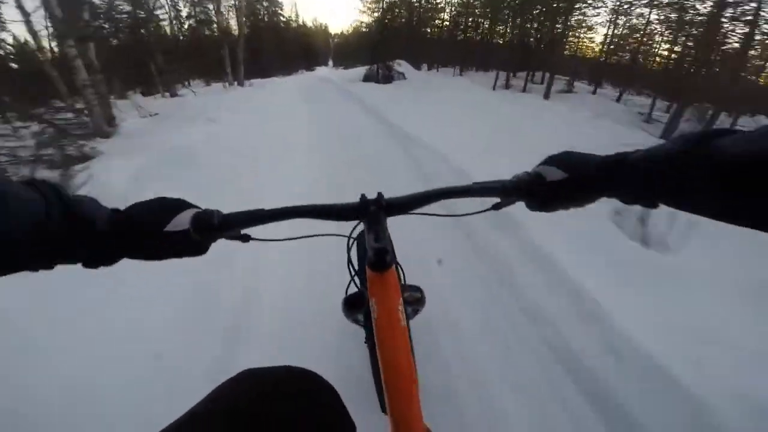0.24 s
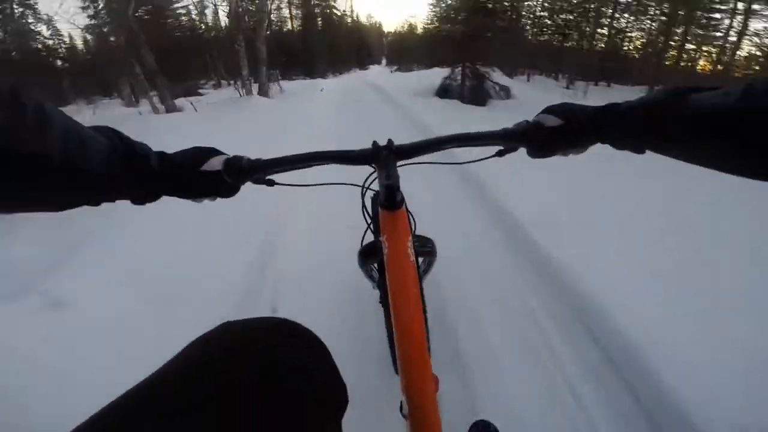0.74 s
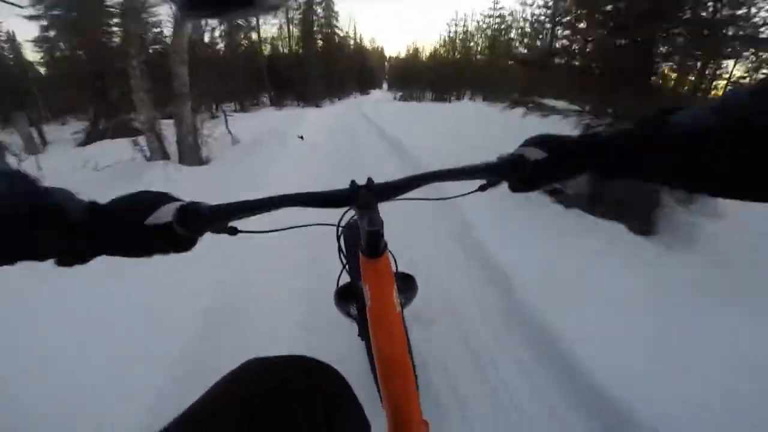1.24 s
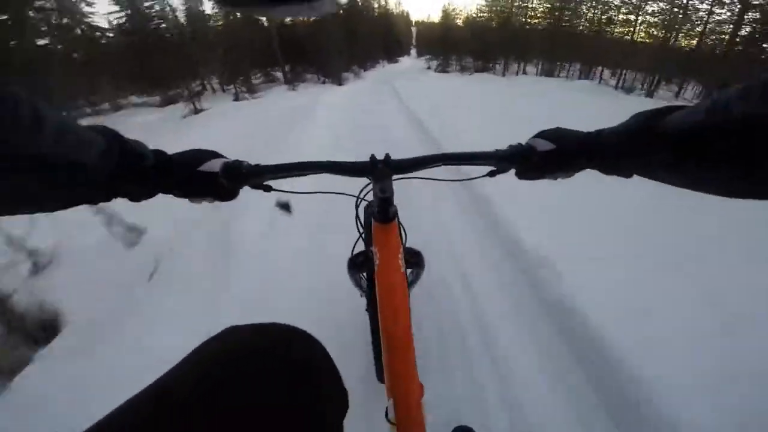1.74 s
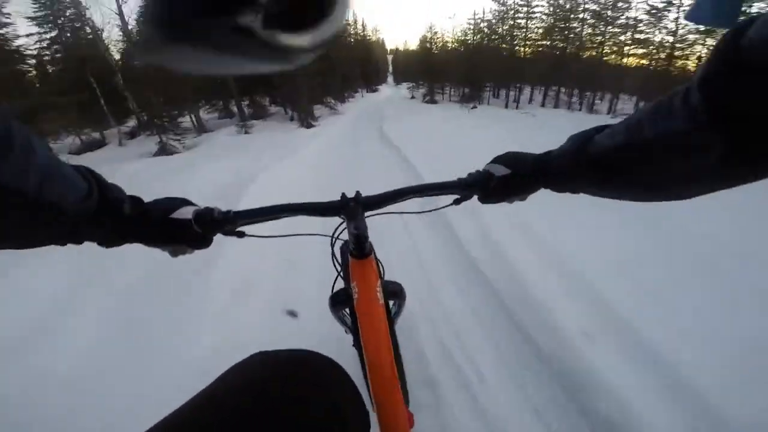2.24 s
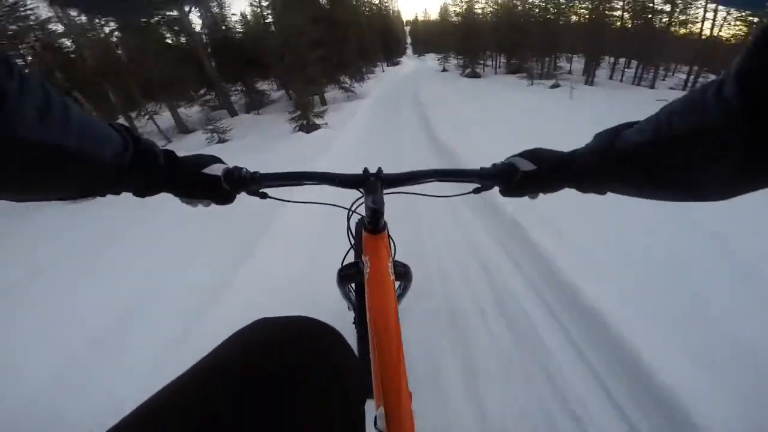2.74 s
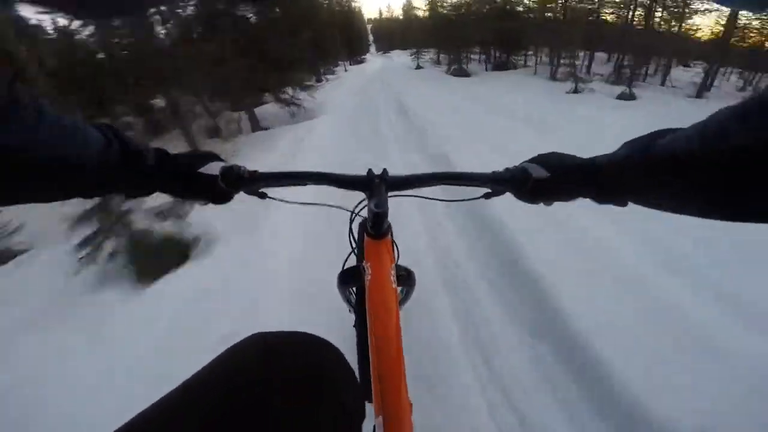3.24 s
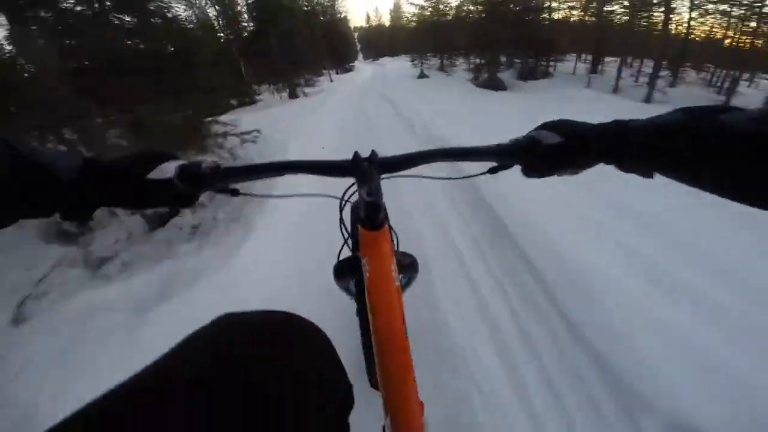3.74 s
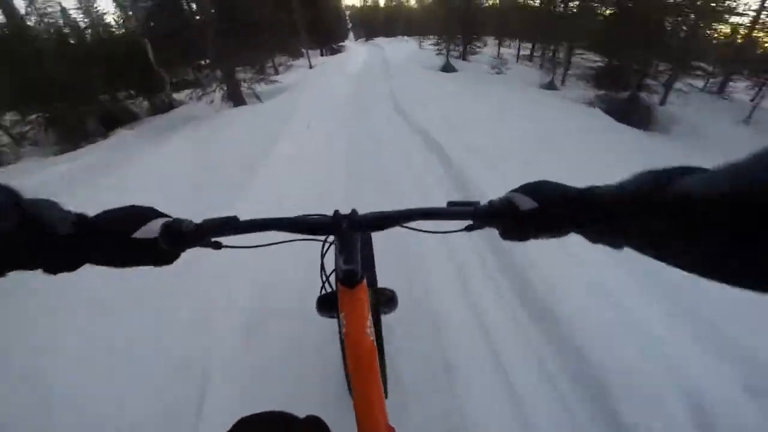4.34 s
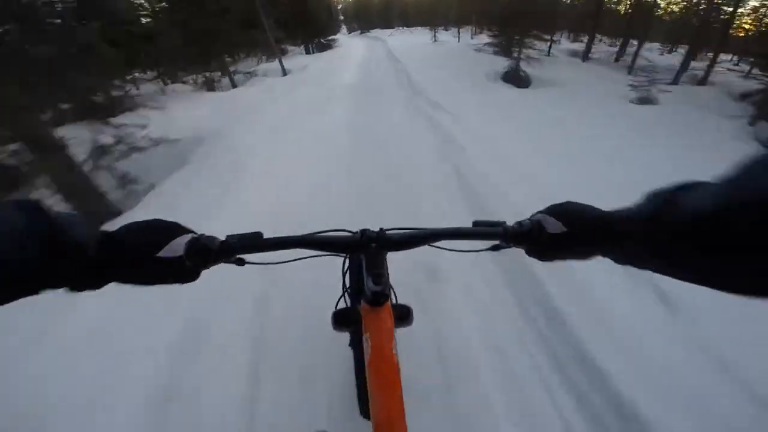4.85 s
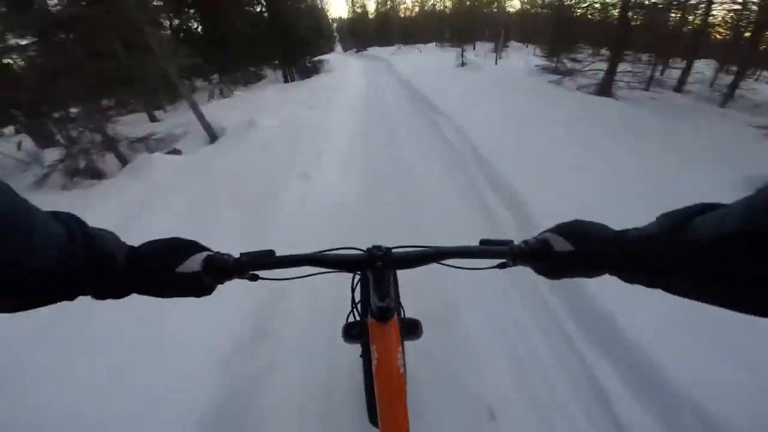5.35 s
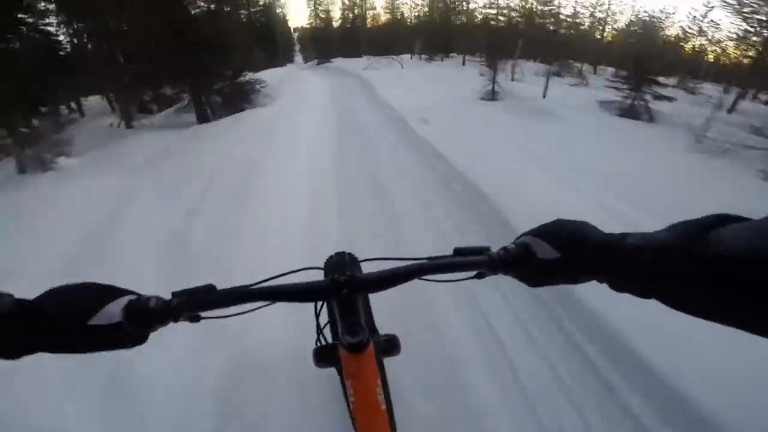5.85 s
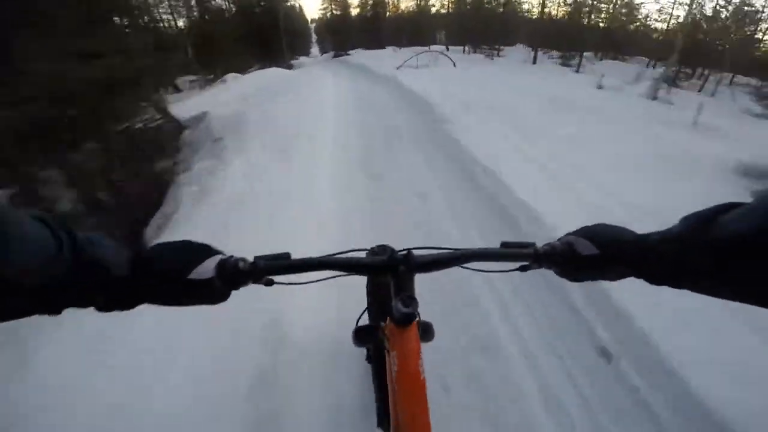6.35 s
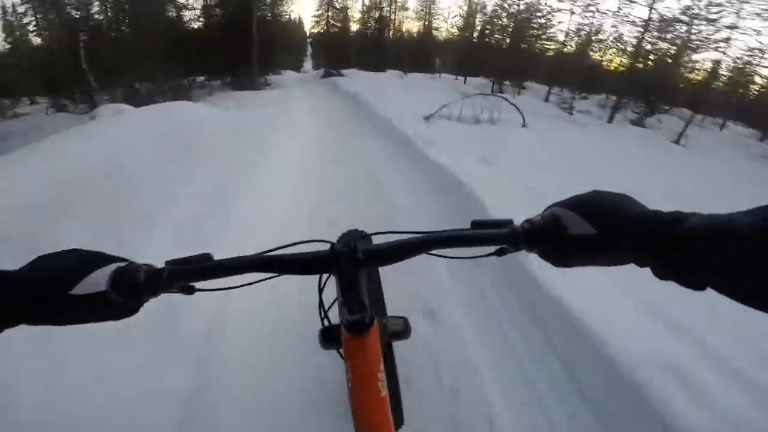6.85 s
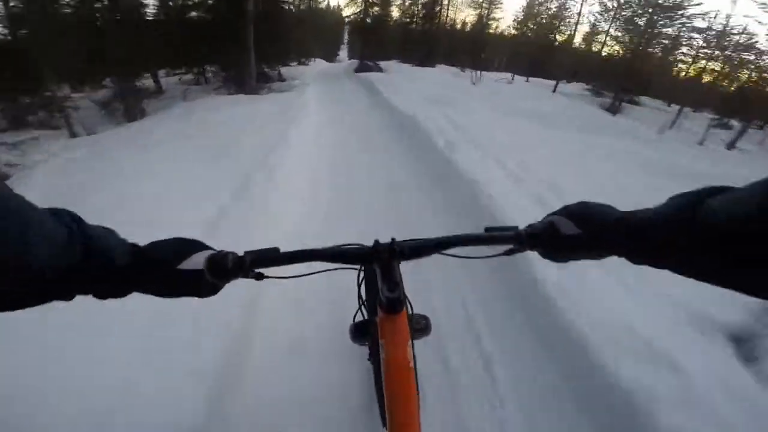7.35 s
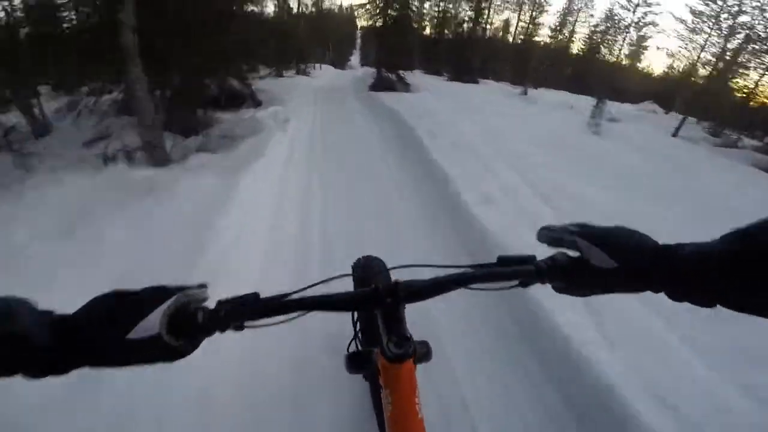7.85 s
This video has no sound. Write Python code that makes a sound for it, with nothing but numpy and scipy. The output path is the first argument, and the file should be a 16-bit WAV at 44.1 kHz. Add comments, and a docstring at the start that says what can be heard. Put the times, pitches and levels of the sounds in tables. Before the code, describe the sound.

A bicycle rolls along a snowy trail, hissing and rumbling, with wind gusts, small metallic ticks and two hard plastic clacks up close.

```python
"""Fat bike on a snow trail

Wide tyres crunch and rumble over packed snow, heard from a camera on the rider's chest.
Wind buffets the microphone, bumps thud through the mount, the chain ticks and plastic rubs briefly.
Something hard knocks on the camera's case; after the two hardest knocks the camera turns
its own volume down, then slowly back up."""
import sys
import numpy as np
from scipy import signal
from scipy.fft import rfft, irfft, next_fast_len
from scipy.io import wavfile
from scipy.ndimage import uniform_filter1d, minimum_filter1d, map_coordinates

SR = 44100
rng = np.random.default_rng(int(sys.argv[2]) if len(sys.argv) > 2 else 0)


def pcm_store(signal):
    """Save signal as 16-bit PCM."""
    levels = np.round(np.clip(np.atleast_2d(signal), -1, 1) * 32767)
    wavfile.write(sys.argv[1], SR, levels.astype(np.int16).T)


N = 357629


# How loudly the snow crunches along the ride: time_s, level_db
CRUNCH_LEVELS = [(0, -43), (0.33, -47), (0.55, -44.5), (1.0, -47), (1.5, -42.5), (2.2, -47.5), (2.7, -46.5),
                 (3.0, -43.5), (3.45, -45.5), (4.3, -42.5), (4.7, -43.5), (4.93, -39.5), (5.28, -44),
                 (5.5, -41), (6.35, -41), (6.78, -41.5), (7.0, -45.5), (8.11, -46.5)]
# The tone of crushed snow, from low to high: pitch_hz, level_db
SNOW_TONE = [(200, -37), (600, -11.5), (1000, -5.5), (1700, -3.5), (2700, -3), (3200, -6), (3700, -14),
             (5000, -20.5), (6500, -24.5), (7300, -28), (10000, -24), (14500, -26.5), (15500, -47.5)]
# Pitches that the camera's case brings out in the crunch: pitch_hz, width_hz, boost_db
CASE_BOOSTS = [(1340, 180, 4), (2303, 325, 6), (4470, 550, 6.5), (5610, 440, 4.5), (6270, 350, 3.5)]
# The tone of the rumbling tyres: pitch_hz, level_db
RUMBLE_TONE = [(30, -21), (60, 8), (100, 8.5), (150, 1), (210, -1), (300, 1.5), (480, 1.5), (750, -4),
               (1200, -22), (2500, -41.5)]

def tyres():
    """Countless snow grains break under the tread, while the soft tyres rumble."""
    crunch_db = over_time(CRUNCH_LEVELS)
    rumble_db = -47 + .8 * (crunch_db + 45)  # the rumble rises and falls with the crunch
    grains_per_s, spread_db = 2000, 2.2
    breaks = rng.random(N) < grains_per_s / SR
    grains = breaks * rng.standard_normal(N) * amp(spread_db * rng.exponential(size=N))
    crush = patchy(rng.standard_normal(N) + .5 * unit(grains), depth_db=1.34)

    def boost_db(hz):
        return sum(db / (1 + (2 * (hz - centre) / width) ** 2) for centre, width, db in CASE_BOOSTS)

    crunch = unit(filtered(crush, lambda hz: amp(along(SNOW_TONE, hz) + boost_db(hz))))
    rumble = with_tone(patchy(rng.standard_normal(N), depth_db=1.5), RUMBLE_TONE)
    uneven_db = 0.21 * wobble(6)  # firmer and softer stretches of trail
    crunch *= amp(crunch_db + 0.92 * wobble(25))
    rumble *= amp(rumble_db + .66 * wobble(30))
    return amp(uneven_db) * (crunch + rumble)


# Knocks on the case, each with its own loudness and brightness. The spot hit boosts or cuts one band:
# start_s, clack_db, brightness_hz, spot_hz, spot_db, thud_db, thud_hz, ring_db
CASE_KNOCKS = [(1.1485, -31, 2490, 1365, 3.5, -38, 200, -73),
               (1.1947, 4.5, 3000, 1720, 1, -16.5, 131.4, -21),
               (2.2393, -25, 2000, 1400, 4, -24.5, 89.3, -68), (2.7043, -20, 12000, 2520, -3, -18, 92, -67),
               (2.7051, -13, 6000, 1250, 2.5, -11, 91, -70), (3.1864, -34, 2570, 1400, 4, -40, 200, -72),
               (3.6539, 6, 3160, 1680, 3.5, -12, 193, -21)]
# The tones in the case's short clack: pitch_hz, level_db, fade_s
CASE_TONES = [(780, -17, 0.0046), (1010, -7, 0.012), (1392, -1.5, 0.019), (1891, -1, 0.012),
              (2064, -2, 0.017), (2485, 0.5, 0.021), (2790, -10, 0.03), (3246, -11.5, 0.018),
              (4210, -12, 0.0092), (5860, -9.5, 0.0048), (7160, -12, 0.015), (9910, -33.5, .008)]
# The tones of the hard thing that hits it: pitch_hz, level_db, fade_s
STRIKER_TONES = [(1150, -1.5, 0.097), (1880, 1.5, 0.25), (2810, -17.5, .09), (5600, -19.5, 0.054),
                 (8300, -26, 0.031)]

def knocks():
    """Each knock clacks the plastic case and rocks its mount; hard ones leave the striker ringing."""
    spot_width_hz, onset_s = 350, .005
    track = np.zeros(N)
    for start_s, clack_db, brightness_hz, spot_hz, spot_db, thud_db, thud_hz, ring_db in CASE_KNOCKS:
        def contact(hz):
            band = 1j * hz * spot_width_hz / (spot_hz ** 2 - hz ** 2 + 1j * hz * spot_width_hz)
            return (1 + (amp(spot_db) - 1) * band) / (1 + 1j * hz / brightness_hz)

        clack = filtered(ring(CASE_TONES, crack=0.44, crack_fade_s=0.018), contact)
        onset_level = np.std(clack[:round(onset_s * SR)])
        add(track, start_s, amp(clack_db) * clack / onset_level)
        add(track, start_s, amp(thud_db) * thud(thud_hz, fade_cycles=2.9, rise_cycles=0.049))
        add(track, start_s, amp(ring_db) * ring(STRIKER_TONES, crack=0.12, crack_fade_s=.02))
    return track


# Gusts on the microphone: peak_s, length_s, boost_db
WIND_GUSTS = [(0.05, 0.2, 3.5), (0.6, 0.28, 4), (1.5, 0.55, 9), (2.42, 0.15, 6), (2.667, 0.097, 12.5),
              (3.27, 0.4, 14), (3.53, 0.13, 9.5), (5.181, 0.18, 7.5), (5.65, 0.42, 5.5), (6.592, 0.15, 9.5),
              (7.503, 0.57, 5), (7.976, 0.14, 11.5)]
# The deep tone of buffeting air: pitch_hz, level_db
WIND_TONE = [(5, -24.5), (14, 2.5), (22, -1), (35, -11), (60, -18), (120, -28), (300, -56.5), (1000, -100)]

def wind():
    """Riding wind pushes on the microphone in slow lumps; each gust swells and fades smoothly."""
    t = np.arange(N) / SR
    gust_db = sum(db * np.exp(-(2 * (t - peak_s) / length_s) ** 2) for peak_s, length_s, db in WIND_GUSTS)
    air = with_tone(rng.standard_normal(N), WIND_TONE)
    breeze_db = -40.5 + 1.66 * wobble(4.194)
    fluttering_air = unit(air * amp(1.9 * wobble(21)))
    return amp(breeze_db + gust_db) * fluttering_air


# Bumps in the trail (a short rise is a sharp jolt): start_s, peak_db, pitch_hz, rise_cycles
TRAIL_BUMPS = [(0.201, -41, 93, 1.9), (.650, -40, 85, 1.9), (.838, -35, 119, 1.9), (1.584, -30, 121, 1.9),
               (1.988, -37.5, 109, 1.9), (2.147, -30.5, 330, 0.27), (3.1116, -29.5, 378, 0.11),
               (3.186, -30, 228, .6), (3.996, -29.5, 126.4, 1.9), (3.999, -36, 264, 1),
               (5.013, -32, 95, 1.9), (6.929, -32.5, 92, 1.9), (7.546, -34, 108, 1.9), (7.693, -37, 204, 1),
               (7.862, -34, 123, 1.9)]

def bumps():
    """Uneven snow jolts the rider and the camera mount."""
    track = np.zeros(N)
    for start_s, peak_db, pitch_hz, rise_cycles in TRAIL_BUMPS:
        add(track, start_s, amp(peak_db) * thud(pitch_hz, fade_cycles=6.6, rise_cycles=rise_cycles))
    return track


# Taps of the chain: start_s, peak_db
CHAIN_TICKS = [(1.3813, -22.5), (1.4766, -27.5), (4.1321, -36.5), (5.0640, -26.5), (5.169, -29.5),
               (6.6195, -38), (6.8967, -35), (7.3124, -29), (7.3945, -26.5), (7.6805, -37.5),
               (7.7745, -33.5), (8.0672, -36)]
# The tones of its ringing steel: pitch_hz, level_db, fade_s
CHAIN_TONES = [(3290, 4.5, 0.03), (4530, 0, 0.021), (5620, 7, 0.034), (6270, 2.5, 0.028), (8150, -15, .02),
               (10350, -22.5, 0.026)]

def chain():
    """The chain taps its guide now and then and rings for a moment."""
    track = np.zeros(N)
    for start_s, peak_db in CHAIN_TICKS:
        tick = ring(CHAIN_TONES, crack=0.96, crack_fade_s=0.026)
        tick = filtered(tick, lambda hz: 1 / (1 + 1j * hz / 6000))  # soften the highs
        add(track, start_s, amp(peak_db) * tick / np.abs(tick).max())
    return track


# Tiny slips of the case under a rubbing touch: peak_s, level_db, rise_s
CASE_SLIPS = [(2.2405, -32, 0.0012), (2.251, -28, 0.0023), (2.2620, -27.5, 0.001), (2.2750, -36, 0.0027),
              (2.2900, -28.5, 0.0074)]
# The tone of rubbed plastic: pitch_hz, level_db
CREAK_TONE = [(400, -29), (620, -21), (820, -1), (1600, 3), (2500, -2), (3500, -11), (6000, -31),
              (14000, -29)]

def rub():
    """Plastic sticks and slips in quick jerks: each builds up, lets go and rocks the mount."""
    fade_s, rock_hz = 0.016, 88
    t = np.arange(N) / SR
    grip, rocking = np.zeros(N), np.zeros(N)
    for peak_s, level_db, rise_s in CASE_SLIPS:
        build_up = np.exp(np.minimum(t - peak_s, 0) / rise_s)
        let_go = amp(-60 * np.maximum(t - peak_s, 0) / fade_s)
        grip += amp(level_db) * build_up * let_go
        add(rocking, peak_s, amp(level_db - 4.5) * thud(rock_hz, fade_cycles=4.8, rise_cycles=0.23))
    return rocking + grip * with_tone(rng.standard_normal(N), CREAK_TONE)


# Faint, high tones from the camera: pitch_hz, level_db
WHINE_TONES = [(8780, -87), (11719, -90), (14626, -91)]

def whine():
    """The camera's electronics give off thin, steady tones."""
    t = np.arange(N) / SR
    return sum(np.sqrt(2) * amp(db) * np.sin(2 * np.pi * hz * t) for hz, db in WHINE_TONES)


def ring(tones, crack, crack_fade_s):
    """One hit: tones of slightly random strength and a crack of noise. Each drops 60 dB as it fades."""
    t = np.arange(SR // 4) / SR
    ringing = sum(amp(db + rng.standard_normal() - 60 * t / fade_s) * np.sin(2 * np.pi * hz * t)
                  for hz, db, fade_s in tones)
    return ringing + crack * amp(-60 * t / crack_fade_s) * rng.standard_normal(len(t))


def thud(pitch_hz, fade_cycles, rise_cycles):
    """A low swing that swells to a peak of 1 and dies away."""
    cycles = pitch_hz * np.arange(SR // 4) / SR
    swell = 1 - np.exp(-cycles / rise_cycles)
    swing = np.cos(2 * np.pi * cycles) * amp(-60 * cycles / fade_cycles) * swell
    return swing / np.abs(swing).max()


def amp(db):
    """Turn decibels into a number to multiply by."""
    return 10 ** (np.asarray(db) / 20)


def unit(x):
    """Scale a sound to an average (rms) level of 1."""
    return x / np.sqrt(np.mean(x ** 2) + 1e-20)


def along(points, hz):
    """Read a table's level at any pitch, sliding between its rows."""
    pitches_hz, levels_db = np.transpose(points)
    return np.interp(np.log(hz + 1), np.log(pitches_hz + 1), levels_db)


def over_time(points):
    """Join (time_s, value) points with straight lines, one value per sample."""
    return np.interp(np.arange(N) / SR, *np.transpose(points))


def wobble(per_s):
    """A smooth curve through per_s random points each second."""
    points = rng.standard_normal(int(N * per_s / SR) + 4)
    return map_coordinates(points, [np.arange(N) * per_s / SR])


def filtered(x, response):
    """Turn each pitch in a sound up or down by response(hz)."""
    size = next_fast_len(len(x) + SR // 2)
    return irfft(rfft(x, size) * response(np.fft.rfftfreq(size, 1 / SR)), size)[:len(x)]


def with_tone(noise, tone):
    """Shape a noise with a tone table and scale it to level 1."""
    return unit(filtered(noise, lambda hz: amp(along(tone, hz))))


def patchy(noise, depth_db):
    """Give a noise random louder and softer patches across pitch and time."""
    spectrum = signal.stft(noise, nperseg=512)[2]
    patches = uniform_filter1d(rng.standard_normal(spectrum.shape), size=6, axis=0)
    patches = uniform_filter1d(patches, size=14, axis=1)
    return signal.istft(spectrum * amp(depth_db * unit(patches)), nperseg=512)[1][:N]


def add(track, start_s, sound):
    """Mix a sound into the track at start_s."""
    part = track[round(start_s * SR):][:len(sound)]
    part += sound[:len(part)]


def scene():
    """All the sounds together, in one channel."""
    return (tyres() + wind() + bumps() + chain() + knocks() + rub() + whine())[None]


def auto_volume(x, max_cut_db, hold_s, recover_db_per_s, react_s):
    """A sound that is too loud pulls the volume down fast; it stays there, then climbs back."""
    over_db = np.clip(20 * np.log10(np.abs(x) + 1e-9), 0, max_cut_db)
    hold = int(hold_s * SR)
    held_db = -minimum_filter1d(-over_db, hold, origin=(hold - 1) // 2, mode="constant")
    climb_db = recover_db_per_s * np.arange(N) / SR
    cut_db = np.maximum.accumulate(held_db + climb_db) - climb_db
    smoothing = np.exp(-1 / (react_s * SR))
    return x * amp(-signal.lfilter([1 - smoothing], [1, -smoothing], cut_db))


# How the camera softens the highest sounds: pitch_hz, level_db
CAMERA_TREBLE = [(8000, 0), (11000, -8.5), (14500, -9), (16000, -30.5)]

def record(dry):
    """The camera turns down after loud knocks, flattens peaks still too big and dulls the highs."""
    highest_hz = 16400
    ducked = auto_volume(dry[0], max_cut_db=15, hold_s=.3, recover_db_per_s=26, react_s=.004)
    flattened = np.clip(ducked, -1, 1)
    return filtered(flattened, lambda hz: amp(along(CAMERA_TREBLE, hz)) * (hz < highest_hz))[None]


dry = scene()
out = record(dry)
pcm_store(out)
```